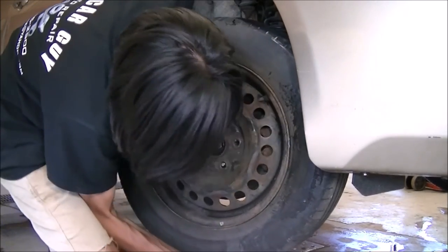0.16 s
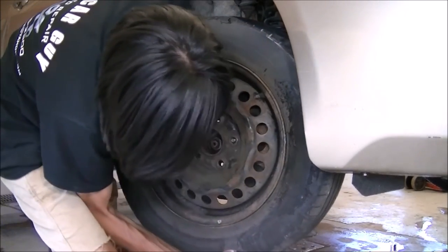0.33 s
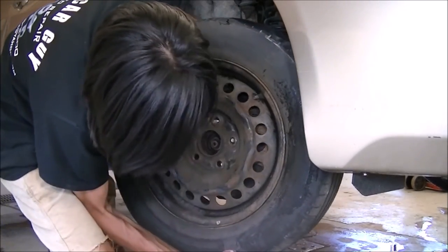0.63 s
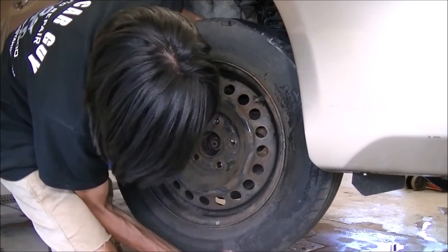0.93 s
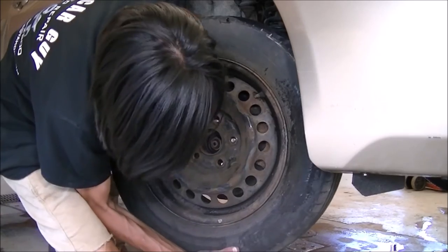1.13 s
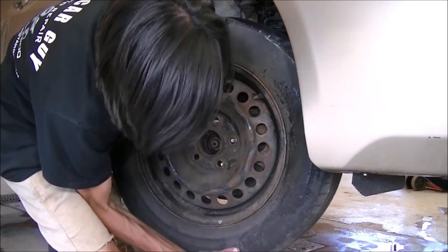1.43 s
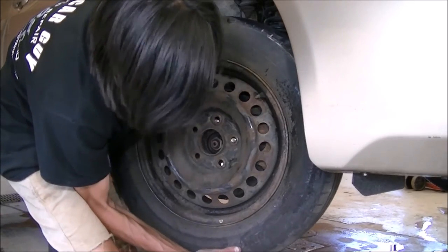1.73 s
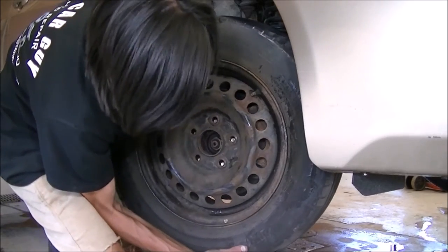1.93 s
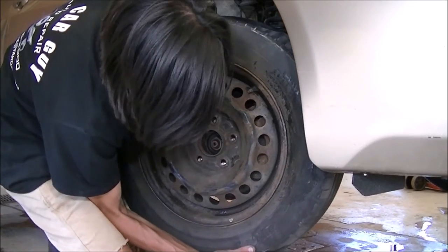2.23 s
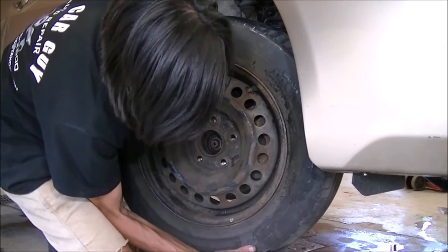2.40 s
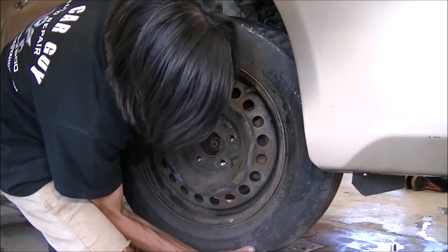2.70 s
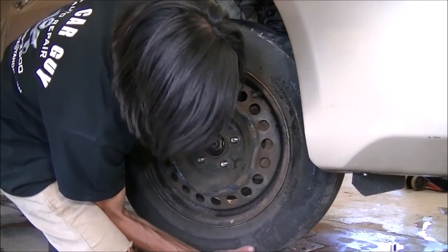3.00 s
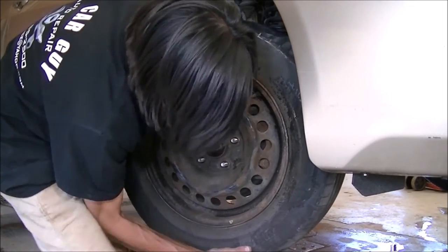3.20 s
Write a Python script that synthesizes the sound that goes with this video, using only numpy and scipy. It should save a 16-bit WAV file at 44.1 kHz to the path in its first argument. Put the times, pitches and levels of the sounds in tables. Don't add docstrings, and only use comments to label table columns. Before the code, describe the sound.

A steel wheel clanks and scrapes on a car hub, heard close. From 0 to 0.5 s, faint stud pings, brief squeaks and light scraping; knocks at 0.7 and a stronger clank at 1.1 s. Soft rubbing and tiny grit ticks fill the quieter stretch to 2.5 s. Clanks quicken from 2.8, slamming hardest at 3.0 with a dull tyre thud, then rough scraping and another loud knock at 3.35. Low quiet garage floor, short faint echo.

```python
import sys
import numpy as np
from scipy import signal
from scipy.fft import rfft, irfft
from scipy.io import wavfile
from scipy.ndimage import uniform_filter1d

SR = 44100
rng = np.random.default_rng(int(sys.argv[2]) if len(sys.argv) > 2 else 0)


def natural_amplitude(level_db):
    exponent = np.asarray(level_db, float) / 20
    return 10 ** exponent


def digitize_waveform(pressure):
    field = np.atleast_2d(pressure).T
    bounded = np.clip(field, -1, 1)
    quanta = np.round(bounded * 32767).astype(np.int16)
    wavfile.write(sys.argv[1], SR, quanta)


N = 147735
T = np.arange(N) / SR
RUB_GRIT_PER_S, FINE_GRIT_PER_S = 4000, 6100
FLICKER_DB = 2

# start in seconds, disc level in dB, tyre thud against the disc in dB,
# favoured disc pitch in Hz.
KNOCKS = [(0.013, -31.5, 10, 1050), (.679, -19, -5.5, 1300), (.758, -10, -2, 1330), (0.841, -31, 9.5, 1400),
          (1.017, -34.5, 7.5, 1300), (1.049, -22, 0, 1270), (1.092, -6, -4, 1158), (1.307, -25, 5.5, 1090),
          (1.731, -20.5, 0, 1156), (2.477, -34.5, -3.5, 1170), (2.581, -17.5, -6.5, 1430),
          (2.848, -11.5, -11.5, 1034), (2.873, -5.5, -15, 1234), (2.884, -9, 1, 1200), (2.93, -17, 2, 1430),
          (3.0117, 2.5, -12.5, 1340), (3.055, -11, -16, 1160), (3.068, -10, -1, 1100),
          (3.346, -1, -16, 1520)]


def unit(x):
    return x / np.sqrt(np.mean(x ** 2))


def band(x, hz, share):
    edges = np.clip([hz / (1 + share), hz * (1 + share)], 20, 0.45 * SR)
    return signal.sosfilt(signal.butter(2, edges, "band", fs=SR, output="sos"), x)


def walk(rate):
    hold = int(SR / rate)
    steps = np.repeat(rng.standard_normal(N // hold + 1), hold)
    return unit(uniform_filter1d(steps, hold)[:N])


def grit(per_s):
    spread_db = 2.5
    happens, sign, strength = rng.random((3, N))
    level = natural_amplitude(-spread_db * np.log(strength + 1 / 500))
    return unit((happens < per_s / SR) * np.sign(sign - 0.5) * level)


def ring(modes, hits, rubbing, favour_db, contact_s, low_hz, wander_db, wander_per_s, turn=1):
    bounce_s, bounce_db = 0.002, -17
    start, level, pitch = hits
    at, n = (start * SR).astype(int), np.arange(512)
    chance = rng.standard_normal((len(at), len(modes)))
    out, rough = 0, grit(RUB_GRIT_PER_S)
    for k, (hz, db, t60) in enumerate(modes):
        pole = np.exp(2j * np.pi * hz / SR - np.log(1000) / (max(t60, 0.01) * SR))
        off_pitch_db = np.minimum(favour_db * abs(np.log2(hz / pitch)), 26)
        blow = np.zeros(N)
        np.add.at(blow, at, -natural_amplitude(level + 3.17 * chance[:, k] - off_pitch_db))
        chatter = natural_amplitude(bounce_db) * rng.standard_normal(512) * np.exp(-n / (bounce_s * SR))
        chatter[0] = 1
        rub = np.roll(rough, k * 4001) * rubbing * np.sqrt(1 - abs(pole) ** 2)
        rub = rub * natural_amplitude(wander_db * walk(wander_per_s))
        blow = signal.oaconvolve(blow, chatter)[:N] / abs(np.sum(chatter * pole.conj() ** n))
        mode = signal.lfilter([1], [1, -pole], rub + blow)
        out = out + natural_amplitude(db) * (turn ** k * mode).imag
    push = np.hanning(int(contact_s * SR) + 3)
    out = np.convolve(out, push / push.sum())[:N]
    return signal.sosfilt(signal.butter(2, low_hz, "high", fs=SR, output="sos"), out)


def wheel():
    force, load, bite = sliding()
    return (disc(force) + tyre(load) + hub(bite) + rasp(bite)
            + wash(load + force * natural_amplitude(-10.5)) + squeals() + slaps())


def disc(force):
    disc_hz = [640, 800, 962, 1038, 1088, 1150, 1305, 1348, 1415, 1540, 1775, 2005, 2440, 2620]
    # strength in dB, t60 in seconds.
    disc_ring = [(-19, 0.11), (-24, 0.085), (-5, 0.1), (-8.5, 0.081), (3, 0.086), (-6.5, 0.061),
                 (-5, 0.031), (-16, 0.29), (-4, 0.05), (-12.5, 0.12), (-8, 0.041), (-16, 0.043),
                 (-10.5, 0.03), (-24.5, 0.057)]
    start, level, _, pitch = np.array(KNOCKS).T
    rubbing = force * natural_amplitude(-6.5) + strokes(order=2)
    return ring(np.c_[disc_hz, disc_ring], (start, level - 5.5, pitch), rubbing,
                favour_db=28.6, contact_s=0.00013, low_hz=850, wander_db=2.9, wander_per_s=25.15)


def tyre(load):
    # pitch in Hz, strength in dB, t60 in seconds.
    tyre_modes = [(134.3, -11, 0.29), (168.2, 0, 0.15), (198.8, -2.5, 0.14), (253.9, 1, 0.086),
                  (315, -3, 0.079), (373, -7.5, 0.074), (412, -9.5, 0.08), (492.3, -9, 0.1)]
    start, level, thud, _ = np.array(KNOCKS).T
    hits = (start, level + thud - 7.5, 320 + 0 * start)
    return ring(tyre_modes, hits, load * natural_amplitude(-3.0), favour_db=3.65, contact_s=0.00061, low_hz=45,
                wander_db=3.5, wander_per_s=24.89, turn=1j ** 0.5)


def hub(bite):
    # start in seconds, level in dB, favoured pitch in
    # Hz.
    pings = [(.002, -30, 7860), (.002, -42, 2940), (.003, -40, 5130), (.012, -35, 8450), (.014, -39, 10120),
             (0.033, -35, 6350), (0.04, -33.5, 8450), (0.047, -48, 2380), (0.082, -27.5, 5130),
             (.082, -35, 2660), (.084, -40, 7860), (.152, -40, 6350), (.152, -43, 8450), (.153, -35, 2500),
             (0.161, -39, 7360), (.168, -39, 2500), (.226, -38, 4100), (.303, -44, 6350),
             (0.304, -37, 8600), (0.311, -39.5, 4100), (.311, -53, 2380), (0.34, -31.5, 8600),
             (0.339, -36, 4100), (0.384, -37.5, 9640), (.385, -35, 2500), (0.386, -36, 4100),
             (0.408, -38, 4100), (.42, -47, 7860), (.445, -45, 7360), (.46, -50, 6650), (.478, -44, 5130),
             (.488, -46, 6650), (0.613, -42, 4480), (.666, -48, 4100), (.667, -50, 5850),
             (0.675, -27, 4100), (.678, -35, 8600),
             (0.759, -36.5, 2940), (.762, -34, 7000), (.984, -47.5, 7410), (0.985, -50.5, 2940),
              (1.015, -41, 4150), (1.093, -30.5, 7350), (1.093, -33, 3320), (1.093, -28.5, 2940),
              (1.197, -44, 4030), (1.196, -37.5, 2940), (1.227, -51, 7300), (1.23, -40, 2500),
              (1.254, -38.5, 4120), (1.631, -47, 2940), (1.798, -39, 2510), (1.908, -48, 2380),
              (2.579, -45.5, 2500), (2.782, -43, 6350), (2.798, -33, 4160), (2.798, -41, 7500),
              (2.849, -27, 3970), (2.848, -38, 6350), (2.86, -35, 5130), (2.848, -37, 8300),
              (2.871, -29, 2940), (2.871, -19.5, 3860), (2.93, -23, 2380), (3.017, -20.5, 2940),
              (3.015, -43, 7500), (3.02, -44, 5850), (3.053, -18.5, 3920), (3.054, -27, 7360),
              (3.054, -29, 8300), (3.055, -35, 2380), (3.067, -23.5, 2940), (3.069, -17, 3700),
              (3.074, -27, 3320), (3.159, -39, 2380)]
    hub_hz = [2376, 2939, 3318, 3484, 4005, 4478, 5134, 5848, 6345, 7358, 7857, 8450, 9640, 10120]
    # strength in dB, t60 in seconds.
    hub_ring = [(3.5, 0.072), (1, 0.092), (-4.5, 0.17), (-31, 0.11), (-3, 0.13), (-9.5, 0.16),
                (-2.5, 0.095), (-1.5, 0.064), (-0.5, 0.15), (-3, 0.11), (-4.5, 0.16), (0.5, 0.068),
                (0, 0.055), (-3, 0.084)]
    stud_hz = [2500, 2660, 3700, 4100, 6650, 7000, 8600]
    # strength in dB, t60 in seconds.
    stud_ring = [(-2.5, 0.078), (2.5, 0.028), (-15, 0.18), (-1.5, 0.041), (-5.5, 0.072), (-7, 0.069),
                 (-7.5, 0.053)]
    modes = np.vstack([np.c_[hub_hz, hub_ring], np.c_[stud_hz, stud_ring]])
    hits = np.array(pings).T
    rubbing = strokes(order=3) * natural_amplitude(-8.5) + bite * natural_amplitude(-19.0)
    return ring(modes, hits, rubbing, favour_db=165.0, contact_s=0.00003, low_hz=1900,
                wander_db=FLICKER_DB, wander_per_s=22.2)


def sliding():
    # time in seconds, force on the disc in dB, tyre load in dB, metal on metal bite in dB.
    slide = [(0, -28.5, -47, -33.5), (0.298, -45.5, -44, -42.5), (.62, -41, -54.5, -43),
             (.8, -41.5, -39, -46.5), (.99, -43.5, -43, -46.5), (1.15, -41, -34.5, -56),
             (1.62, -40.5, -43.5, -46.5), (2.0, -48, -50, -47.5), (2.5, -53, -63, -48),
             (2.8, -48, -46.5, -60), (3.009, -36.5, -33, -45), (3.016, -12.5, -19.5, -49),
             (3.35, -23.5, -25.5, -34.5)]
    time, *levels = np.array(slide).T
    return [natural_amplitude(np.interp(T, time, level)) for level in levels]


def strokes(order):
    # start in seconds, length in seconds, force on the disc in dB, bite on the hub in dB.
    scrapes = [(0, 0.086, -54, -48), (0.079, 0.02, -30, -33), (0.159, 0.02, -54, -43),
               (0.216, 0.049, -41, -45.5), (0.294, 0.08, -37, -42.5), (0.342, 0.067, -35.5, -46),
               (0.375, 0.11, -40.5, -43), (0.421, 0.14, -46, -42), (0.663, 0.062, -42, -37.5),
               (1.202, 0.18, -47, -49), (2.738, 0.094, -61, -51), (2.781, 0.1, -45, -42),
               (3.045, 0.09, -22, -42)]
    out = 0
    for row in scrapes:
        u = np.clip((T - row[0]) / row[1], 0, 9)
        out = out + natural_amplitude(row[order]) * np.minimum(u / 0.1, 1) * np.exp(-u ** 2 * 5.1)
    return out


def rasp(bite):
    pressure = bite * natural_amplitude(-3.0) + strokes(order=3)
    rough = unit(band(grit(FINE_GRIT_PER_S), 4500, 0.85))
    return natural_amplitude(-10 + FLICKER_DB * walk(45)) * pressure * rough


def wash(load):
    load_db, knock_db, t60, tilt_db = -12.5, -15, 0.095, -3.5
    place, phase = rng.random((2, 90, 1))
    t = T[:SR // 4]
    hz = 330 * 15 ** ((np.arange(90)[:, None] + place) / 90)
    partials = natural_amplitude(tilt_db * np.log2(hz / 1000)) * np.sin(2 * np.pi * (hz * t + phase))
    body = np.sum(partials, axis=0) * np.exp(-np.log(1000) * t / t60)
    force = natural_amplitude(load_db + FLICKER_DB * walk(30)) * load * grit(RUB_GRIT_PER_S)
    force = force / np.sqrt(np.sum(body ** 2))
    start, level = np.array(KNOCKS).T[:2]
    force[(start * SR).astype(int)] += natural_amplitude(level + knock_db) / abs(body).max()
    return signal.fftconvolve(force, body)[:N]


def squeals():
    # start in seconds, length in seconds, level in dB, pitch in Hz.
    slips = [
        (0.022, 0.013, -24.5, 990),
        (0.04, 0.018, -24, 1045),
        (0.24, 0.035, -36.5, 1030),
        (0.34, .035, -37, 1090),
        (0.45, 0.017, -40.5, 1050),
        (.003, 0.095, -41.5, 7857),
        (0.089, 0.073, -39, 4005),
        (2.926, 0.064, -39.5, 4005),
        (2.82, 0.022, -41, 1040),
        (2.847, 0.02, -16, 1028),
    ]
    out, wobble = 0, 16 * np.cumsum(walk(120)) / SR
    for s, length, db, hz in slips:
        grip = np.clip((T - s) / 0.0057, 0, 1) * np.exp(-np.maximum(T - s - length, 0) / 0.023)
        out = out + natural_amplitude(db) * grip * np.sin(2 * np.pi * (hz * T + wobble))
    return out


def slaps():
    # start in seconds, peak in dB, pitch in Hz.
    flat_hits = [
        (3.0122, -4, 308),
        (3.067, -12, 320),
    ]
    out = 0
    for s, db, hz in flat_hits:
        u = np.maximum(T - s, 0)
        out = out - natural_amplitude(db + 4.5) * np.sin(2 * np.pi * hz * u) * np.exp(-u / 0.003)
    return out


def ticks():
    # start in seconds, peak in dB, centre in Hz.
    grains = [(.553, -29, 7740), (0.679, -22, 6150), (0.76, -22.5, 4600), (1.091, -21, 4270),
              (1.678, -52, 1990), (1.688, -28, 2020), (1.702, -30, 2080), (1.686, -27, 9000),
              (1.693, -27, 7940), (1.704, -28.5, 5960), (1.939, -25.5, 3600), (2.901, -24, 6350),
              (3.012, -14, 3920), (3.207, -19.5, 8200), (3.283, -35, 7080), (3.32, -28, 6500)]
    decay_s = 0.0012
    out, n = np.zeros(N + 2048), np.arange(2048)
    for s, db, hz in grains:
        crack = band(rng.standard_normal(2048) * np.exp(-n / (decay_s * SR)), hz, 0.6)
        at = int(s * SR)
        out[at:at + 2048] += natural_amplitude(db) * crack / abs(crack).max()
    return out[:N]


def brushes():
    # start in seconds, length in seconds, level in dB, centre in Hz.
    swishes = [
        (1.384, 0.51, -49, 2200),
        (1.68, 0.026, -38, 6700),
        (2.03, 0.29, -60, 5970),
        (3.22, 0.39, -69, 5770),
    ]
    out = 0
    for s, length, db, hz in swishes:
        swell = np.sin(np.pi * np.clip((T - s) / length, 0, 1))
        grain = unit(band(grit(FINE_GRIT_PER_S), hz, 0.5))
        out = out + natural_amplitude(db + FLICKER_DB * walk(38.9)) * swell * grain
    return out


def echo(x, t60, top_hz):
    t = T[:SR // 2]
    tail = rng.standard_normal(len(t)) * np.exp(-np.log(1000) * t / t60) * np.clip(t / 0.019, 0, 1)
    tail = signal.lfilter(*signal.butter(1, top_hz, fs=SR), tail)
    return signal.fftconvolve(x, tail / np.sqrt(np.sum(tail ** 2)))[:N]


def garage():
    # frequency in Hz, level in dB per Hz.
    floor_colour = [(15, -44), (25, 0), (221, 8.5), (537, -39), (760, -5.5), (1080, -13.5), (1660, -17),
                    (9050, -22), (15500, -29.5)]
    hz = np.maximum(np.fft.rfftfreq(N, 1 / SR), 1)
    at_hz, db = np.array(floor_colour).T
    colour = natural_amplitude(np.interp(np.log(hz), np.log(at_hz), db))
    noise = irfft(rfft(rng.standard_normal(N)) * colour, N)
    return natural_amplitude(-48 + 0.5 * walk(2.26)) * unit(noise)


def scene():
    near = signal.lfilter(*signal.butter(2, 11500, fs=SR), wheel() + ticks() + brushes())
    mid = near + natural_amplitude(-14) * echo(near, t60=0.48, top_hz=5260) + garage()
    tinted = mid - 0.31 * band(mid, 152, 1.0) + 0.35 * band(mid, 12400, 0.18)
    side = natural_amplitude(-20) * echo(tinted, t60=0.0067, top_hz=20700)
    return np.array([mid + side, mid - side])


def band_limit(x):
    return signal.sosfilt(signal.butter(12, 15810, fs=SR, output="sos"), x)


def record(dry):
    limit = 1.15
    return band_limit(limit * np.tanh(dry / limit))


dry = scene()
out = record(dry)
digitize_waveform(out)
```